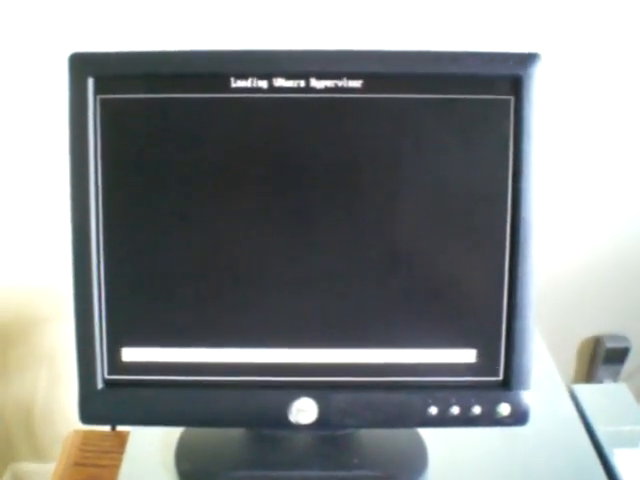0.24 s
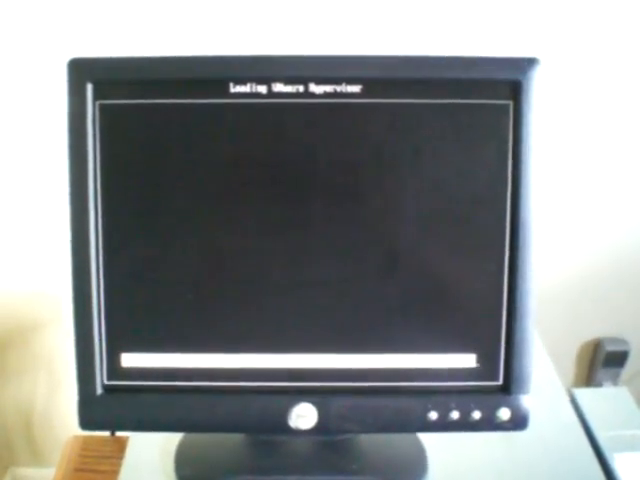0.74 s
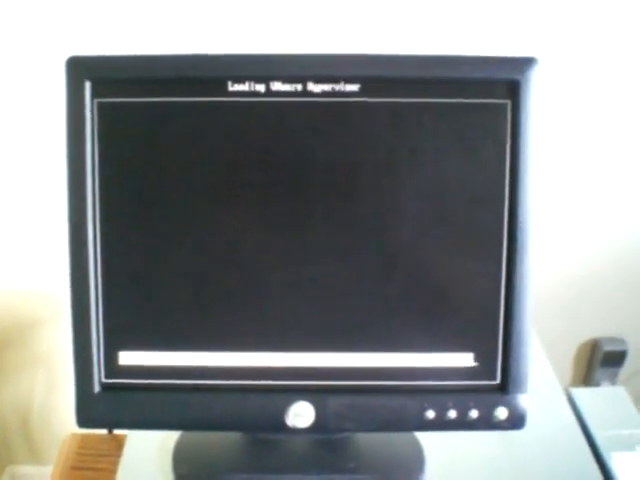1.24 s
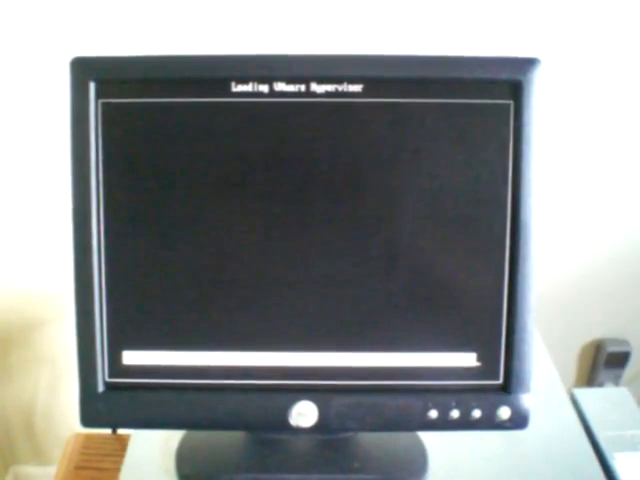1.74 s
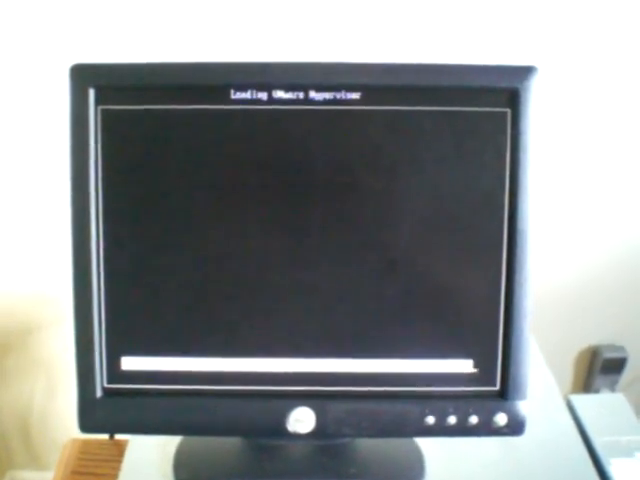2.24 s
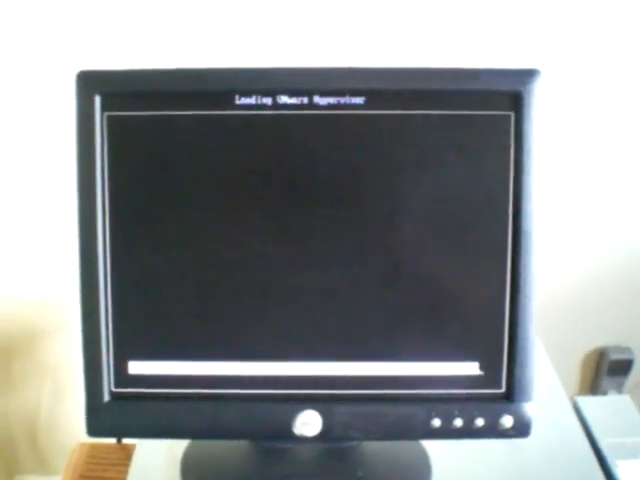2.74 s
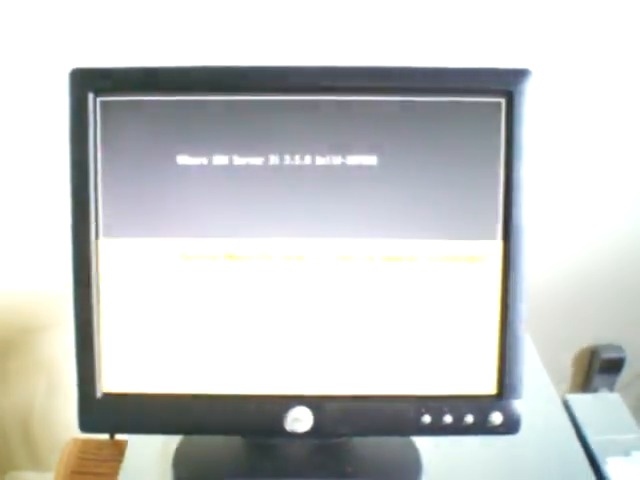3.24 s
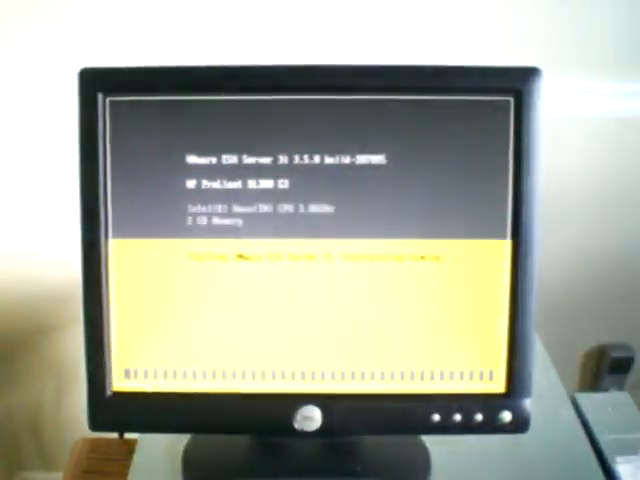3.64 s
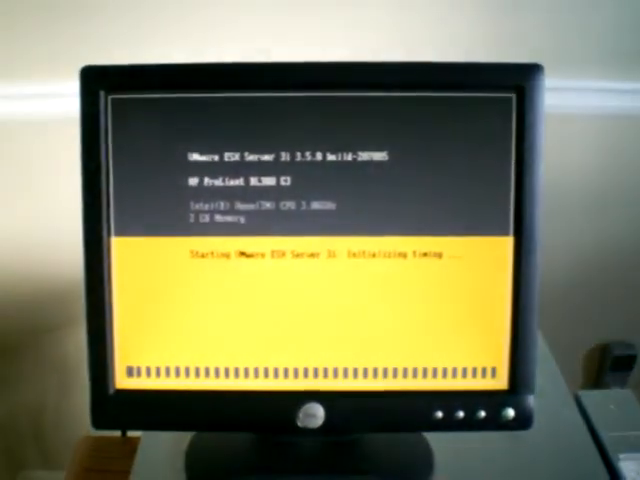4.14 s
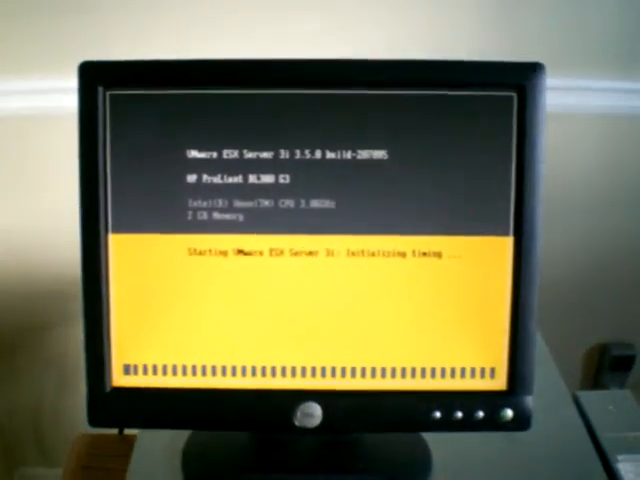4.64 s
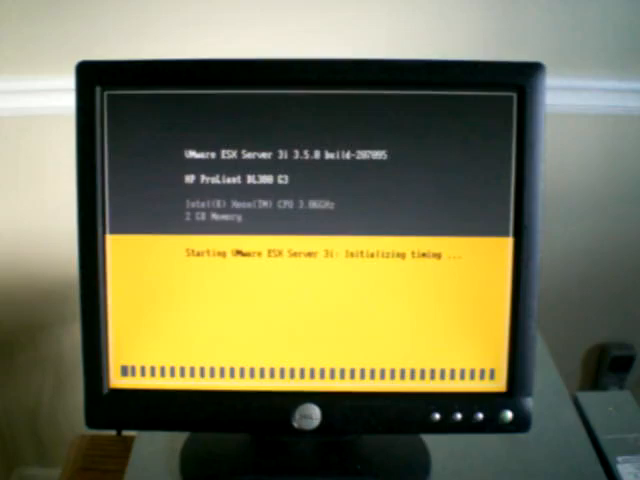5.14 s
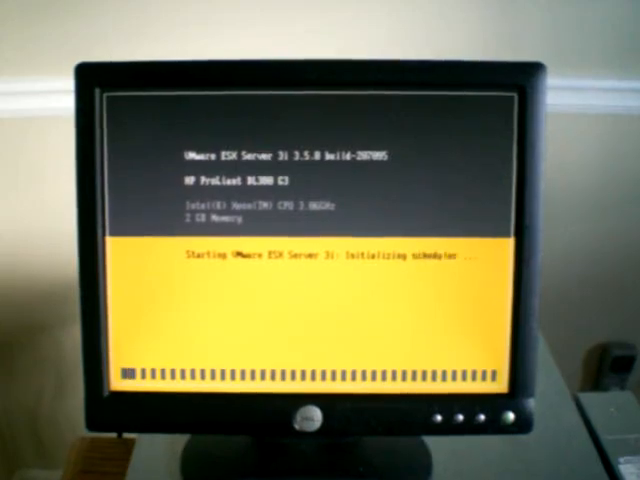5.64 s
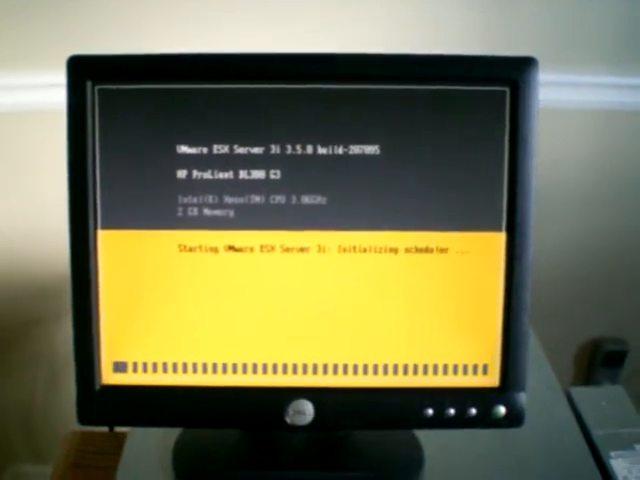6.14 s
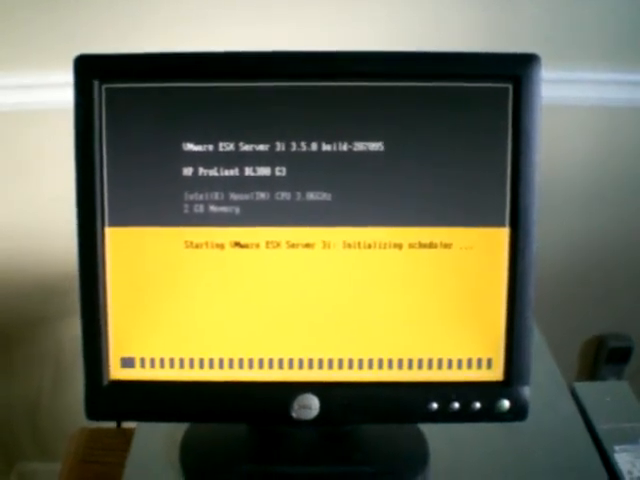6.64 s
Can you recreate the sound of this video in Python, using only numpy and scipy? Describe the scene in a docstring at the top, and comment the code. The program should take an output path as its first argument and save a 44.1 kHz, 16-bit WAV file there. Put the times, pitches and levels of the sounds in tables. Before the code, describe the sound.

Close to an idling computer server in a small room, cooling fans whir without a pause. A constant rush of air carries a medium-pitched, pulsing drone, a softer tone that slowly swells and fades, and a lower fluttering hum. Faint thin whines sit on top. The sound is there from the first moment and stays steady to the end.

```python
"""A small room, one microphone close to an idling computer server.
Four fast fans at almost the same speed throb against each other, two slower ones swell and fade
together, and three low ones flutter; each sings at the rate its blades pass. Steady rotors add
thin whines over the even rush of air through the case. Everything runs from start to end."""
import sys
import numpy as np
from scipy import signal
from scipy.fft import rfft, irfft
from scipy.io import wavfile

SR = 44100
rng = np.random.default_rng(int(sys.argv[2]) if len(sys.argv) > 2 else 0)


def transcribe(u):
    """Save the signal u as a 16-bit wav file named by the first command-line argument.

    u: samples, shape (n,) or (channels, n), limited to [-1, 1]; the rate is SR.
    q: integer samples, one column per channel.
    """
    v = np.clip(np.atleast_2d(u).T, -1, 1)
    q = np.round(v * 32767).astype(np.int16)
    wavfile.write(sys.argv[1], SR, q)


N = 303408
TIME = np.arange(N) / SR
BINS = np.fft.rfftfreq(N, 1 / SR)


def gain_of(db):
    """Decibels to amplitude."""
    return 10 ** (np.asarray(db) / 20)


def unit_rms(x):
    """Scales to rms 1."""
    return x / np.sqrt(np.mean(x ** 2) + 1e-20)


def wander(rate_hz):
    """A smooth random curve of rms 1 that changes at up to about rate_hz."""
    return unit_rms(irfft(rfft(rng.standard_normal(N)) / (1 + (BINS / rate_hz) ** 4), N))


def hunting(fans):
    """Blade rate of each fan [Hz]: its regulator lets it swing gently around the set speed."""
    return [hz + swing * np.cos(2 * np.pi * (TIME - top) / period) for hz, swing, period, top in fans]


def fan_bank(rates, tones, in_step_s, flutter_db):
    """Fans sing at their blade rates and multiples; near-equal rates beat, peaking at in_step_s."""
    out = np.zeros(N)
    for hz, levels in zip(rates, tones):
        passes = np.cumsum(hz) / SR
        passes -= np.interp(in_step_s, TIME, passes)
        # the overtones reach the microphone by many paths, each with its own lag
        lags = np.arange(len(levels)) * rng.random(len(levels))
        tone = sum(gain_of(db) * np.cos(2 * np.pi * ((k + 1) * passes + lags[k]))
                   for k, db in enumerate(levels))
        out += tone * gain_of(flutter_db * wander(rate_hz=5.4))  # uneven inflow shakes the blade load
    return out


# the fast fan loudest at the microphone: (time [s], blade rate [Hz])
LEAD_FAN_RATE = [(0.0, 745.18), (0.49, 745.16), (1.26, 749.23), (1.77, 748.66), (2.67, 746.87),
                 (4.04, 746.96), (4.45, 747.84), (4.91, 746.02), (5.79, 748.32), (6.88, 747.95)]
# the other three: (set blade rate [Hz], swing [Hz], hunting period [s], time of top speed [s])
FAST_FAN_RATES = [(742.63, 0.2, 5.28, 2.22), (756.06, 0.72, 2.13, 1.95), (770.07, 0.6, 6.69, 3.34)]
# one row a fan, the loudest first: (levels of blade harmonics 1 to 6 [dB])
FAST_FAN_LEVELS = [(-33.5, -52, -55.5, -64.5, -75, -66.5), (-37, -51.5, -58.5, -65.5, -70.5, -68),
                   (-42.5, -52, -68, -68.5, -74, -62), (-39, -45.5, -56.5, -52.5, -61, -65.5)]


def fast_fans():
    """Four fans with blade rates some hertz apart throb against each other."""
    lead_hz = np.interp(TIME, *np.transpose(LEAD_FAN_RATE))
    rates = [lead_hz] + hunting(FAST_FAN_RATES)
    return fan_bank(rates, FAST_FAN_LEVELS, in_step_s=1.395, flutter_db=0.5)


# the slower pair: (set blade rate [Hz], swing [Hz], hunting period [s], time of top speed [s])
SLOW_FAN_RATES = [(609.18, 0.19, 4.33, 2.2), (609.84, 0.29, 7.32, 1.8)]
# one row a fan: (levels of blade harmonics 1 to 3 [dB])
SLOW_FAN_LEVELS = [(-41, -61.5, -50.5), (-42, -59, -62)]


def slow_fans():
    """Two fans so close in speed that the microphone hears one tone swell and fade."""
    return fan_bank(hunting(SLOW_FAN_RATES), SLOW_FAN_LEVELS, in_step_s=2.62, flutter_db=0.3)


# the low fans: (set blade rate [Hz], swing [Hz], hunting period [s], time of top speed [s])
LOW_FAN_RATES = [(424.45, 0.46, 7.92, 1.05), (427.13, 0.48, 7.84, 0.15), (431.82, 0.31, 2.45, 1.45)]
# one row a fan, before the swell: (levels of blade harmonics 1 and 2 [dB])
LOW_FAN_LEVELS = [(-42.5, -64.5), (-46, -67), (-44, -62.5)]
# their shared swell: (time [s], gain [dB])
LOW_FAN_SWELL = [(0, 0.5), (2.6, -1.7), (4.5, 2.3), (6.88, 2)]


def low_fans():
    """Three low fans beat and flutter; their level dips, then grows a little."""
    hum = fan_bank(hunting(LOW_FAN_RATES), LOW_FAN_LEVELS, in_step_s=6.314, flutter_db=2.0)
    swell_db = np.interp(TIME, *np.transpose(LOW_FAN_SWELL))
    return hum * gain_of(swell_db)


# shaft hums, blade tones and whines at the microphone: (frequency [Hz], level [dB])
ROTOR_TONES = [(87.1, -67), (91.3, -64.5), (110, -76.5), (167.2, -67), (273.9, -57.5), (324, -51),
               (332.9, -52), (365.2, -49.5), (477.8, -50), (530.4, -49.5), (577.65, -45), (582.6, -41.5),
               (639.1, -48), (696.8, -51), (1095.7, -47), (1155.3, -46.5), (1165.2, -54.5), (1664.6, -52),
               (1732.9, -52), (1980.4, -57), (2330.5, -54), (2546, -58.5), (2561.8, -56), (3465.8, -64.5),
               (4043.4, -63), (4660.1, -63), (5229, -64.5), (5390, -65), (6928, -79), (8742, -70.5)]


def rotor_whines(drift=0.00016, flutter_db=1.6):
    """Thin tones from rotors that hold their speed closely."""
    out = np.zeros(N)
    for hz, db in ROTOR_TONES:
        drifting_hz = hz * (1 + drift * wander(rate_hz=1.26))
        cycles = np.cumsum(drifting_hz) / SR + rng.random()
        out += gain_of(db + flutter_db * wander(rate_hz=5.2)) * np.cos(2 * np.pi * cycles)
    return out


# turbulent air, close to the case: (frequency [Hz], relative spectral density [dB])
AIR_SPECTRUM = [(20.0, -35), (70.0, -30), (140.0, -15.5), (225.0, -29.5), (260.0, -6), (500.0, -1),
                (900.0, -4), (1300.0, -10.5), (1750.0, -10.5), (2600.0, -17.5), (3500.0, -14),
                (6200.0, -21.5), (6650.0, -26.5), (10000.0, -31)]
# resonances and cancellations of case and room: (frequency [Hz], width [Hz], gain [dB])
CASE_AND_ROOM = [(78, 7, -8.5), (98, 7.1, -4), (126.4, 15.7, -10), (212.8, 19.2, 12.5), (253, 7, 1),
                 (263.4, 6.8, -5.5), (327, 7.7, -3.5), (398, 31, -5), (501, 12, -3), (550, 11.6, -8),
                 (593, 11, -7.5), (640.5, 12.6, -9.5), (666, 14, 2), (701, 20, -6.5), (1008, 23, -3),
                 (1099, 7.8, 4), (1310, 40, -0.5), (1410, 39, 4), (1910, 60, 1), (4680, 149, 2)]


def air_rush(level_db=-29.5, swell_db=0.12, ripple_db=1.02, ripple_width_hz=6, ripple_top_hz=3500):
    """Air tears through grilles and heat sinks; case and room colour the noise."""
    air_hz, air_db = np.transpose(AIR_SPECTRUM)
    shape_db = np.interp(np.log(BINS + 1), np.log(air_hz), air_db)
    shape_db += sum(db * np.exp(-((BINS - hz) / width) ** 2) for hz, width, db in CASE_AND_ROOM)
    # crowded room modes leave a fine, steady ripple on the spectrum, which evens out in the treble
    bump = np.exp(-(np.arange(-400, 401) * BINS[1] / ripple_width_hz) ** 2)
    ripple = unit_rms(signal.fftconvolve(rng.standard_normal(len(BINS)), bump, "same"))
    shape_db += ripple_db * ripple / np.hypot(1, BINS / ripple_top_hz)
    air = irfft(rfft(rng.standard_normal(N)) * gain_of(shape_db), N)
    return gain_of(level_db + swell_db * wander(rate_hz=1.5)) * unit_rms(air)


def scene():
    """Close to the server, in mono: fan tones over the rush of air."""
    tones = fast_fans() + slow_fans() + low_fans() + rotor_whines()
    return (np.sqrt(2) * tones + air_rush())[None]  # sqrt(2) makes the tone levels rms


def record(dry, edge_hz=10050):
    """The recorder behind the microphone cuts the treble above edge_hz."""
    lowpass = signal.firwin(1023, edge_hz, window=("kaiser", 9), fs=SR)
    return signal.oaconvolve(dry, lowpass[None], "same")


dry = scene()
out = record(dry)
transcribe(out)
```